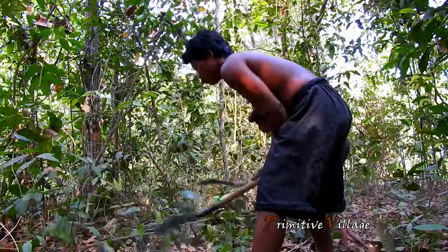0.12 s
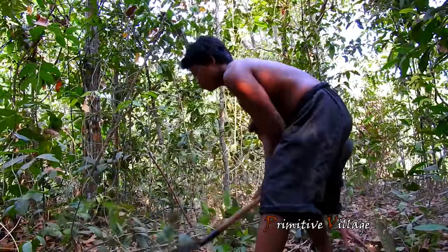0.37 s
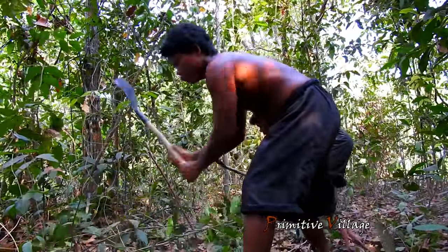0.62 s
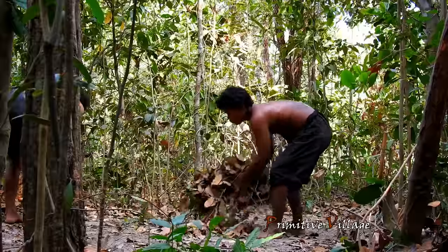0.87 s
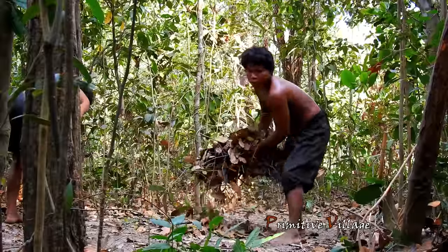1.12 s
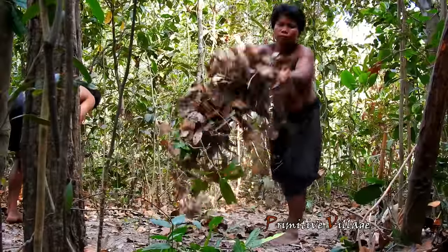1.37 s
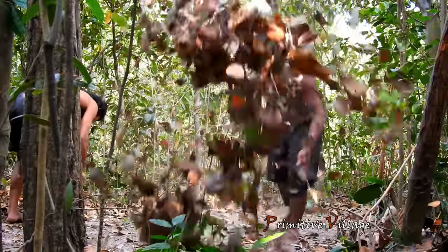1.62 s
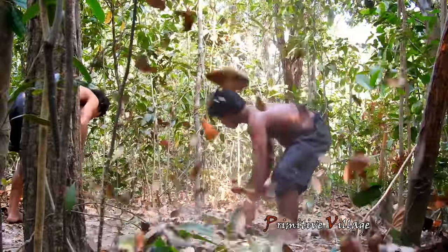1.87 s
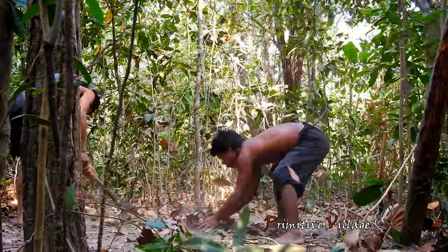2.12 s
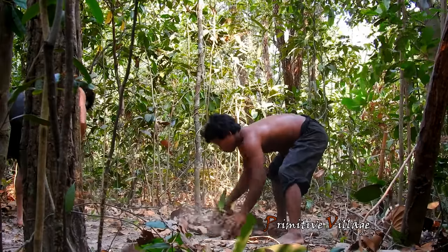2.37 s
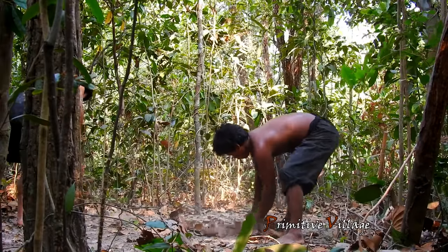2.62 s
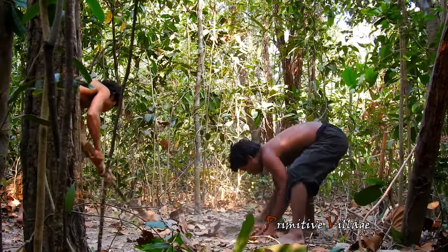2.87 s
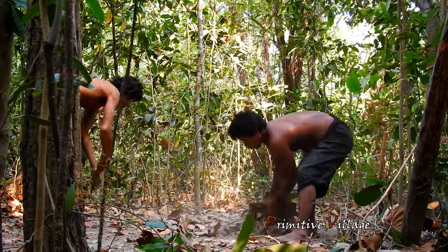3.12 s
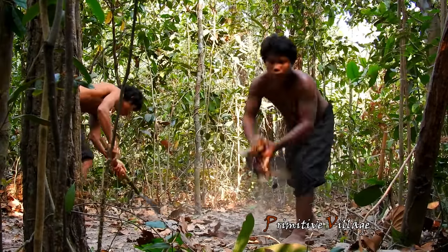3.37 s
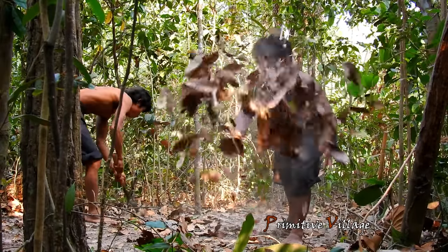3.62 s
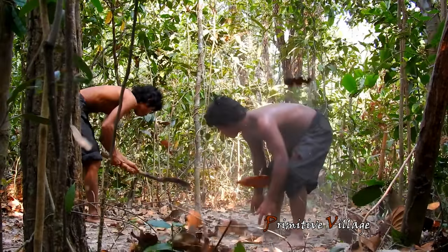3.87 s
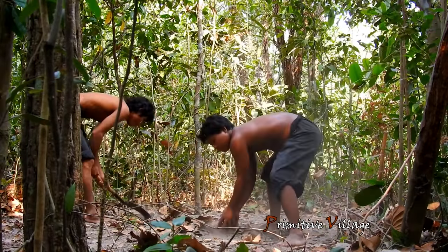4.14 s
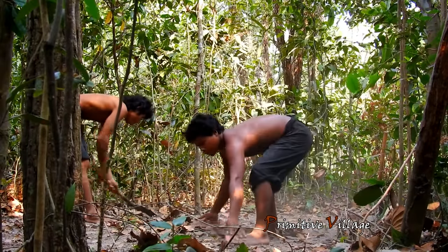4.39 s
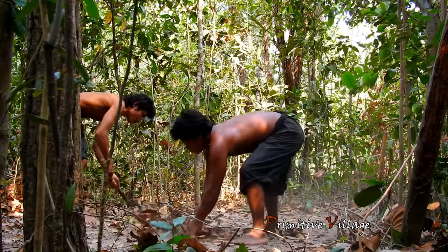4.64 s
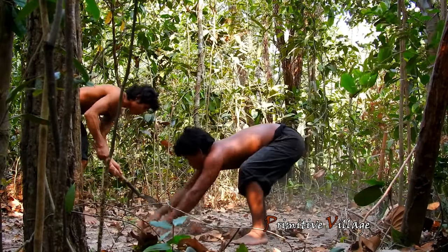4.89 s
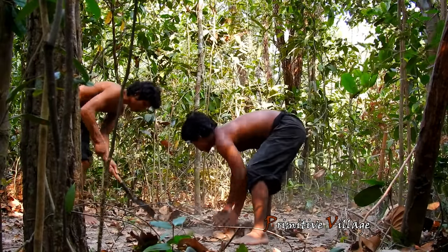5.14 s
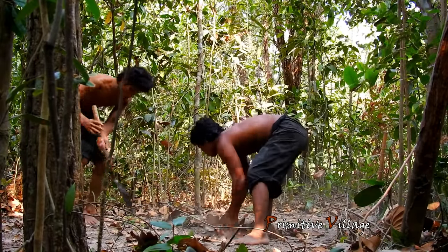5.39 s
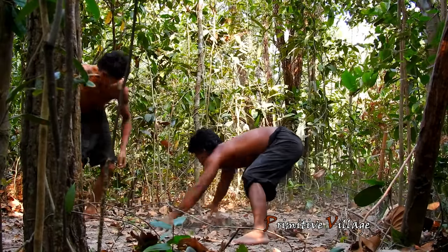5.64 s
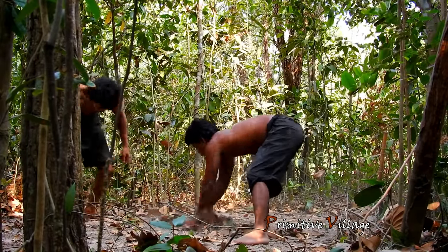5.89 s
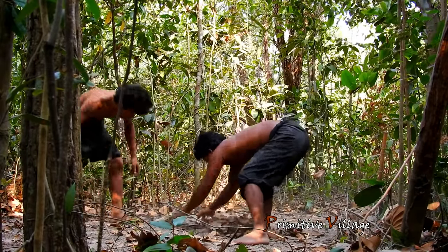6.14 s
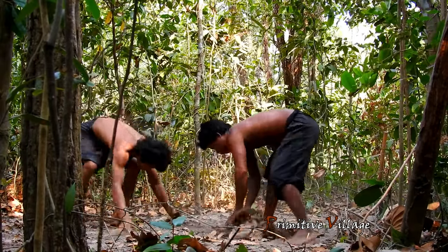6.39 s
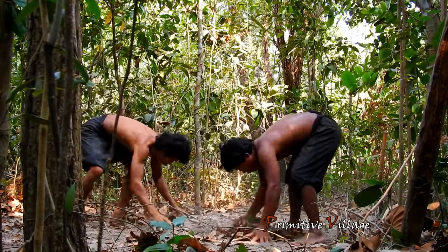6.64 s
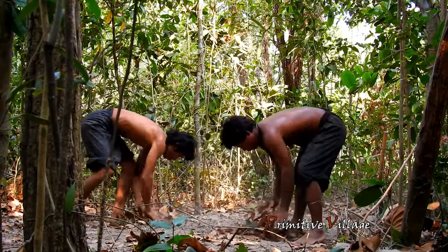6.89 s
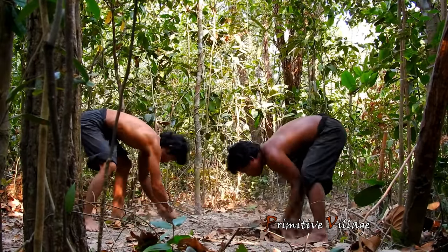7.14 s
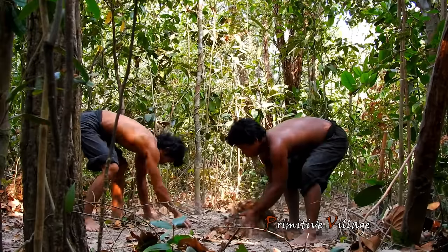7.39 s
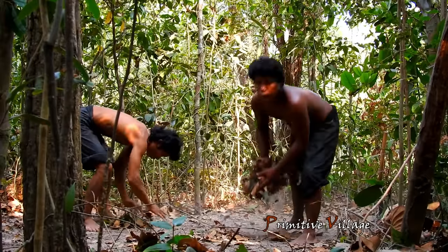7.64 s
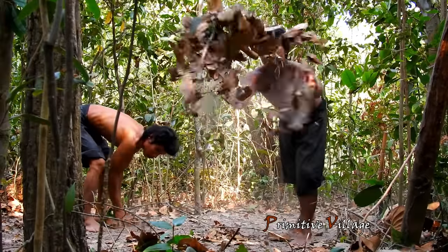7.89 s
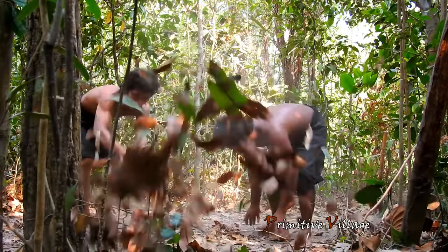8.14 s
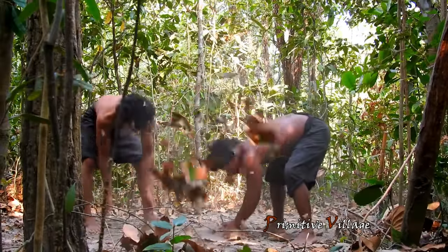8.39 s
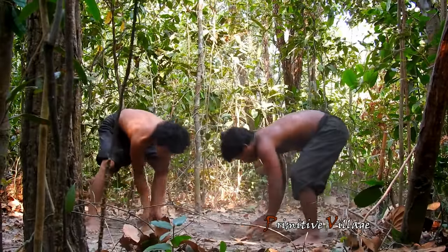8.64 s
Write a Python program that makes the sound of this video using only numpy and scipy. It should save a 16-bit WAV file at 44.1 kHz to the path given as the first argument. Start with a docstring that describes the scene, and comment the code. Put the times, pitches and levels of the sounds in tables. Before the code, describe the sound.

Hoe chops bite into dry leaf litter, then armfuls of crackling leaves are swept up and dropped under a steady high cicada hiss.

```python
"""A forest floor: dry leaf litter is hoed, swept up by hand and thrown, under a steady chorus of cicadas.
Leaves crackle as dense random clicks that ring at many pitches; twigs snap in short bursts of cracks.
Clods, feet and blade thud as damped low tones, and near blows set the hoe's own modes ringing.
Filtered noise rumbles as air and a low sine hums in spells, perhaps a far motor.
The loudest peaks clip, and early on the level dips briefly to near silence."""
import sys
import numpy as np
from scipy import signal
from scipy.fft import rfft, irfft
from scipy.io import wavfile

SR = 44100
rng = np.random.default_rng(int(sys.argv[2]) if len(sys.argv) > 2 else 0)


def ratio(d):
    """dB to gain"""
    e = np.asarray(d, float) / 20
    return 10 ** e


def inscribe(sig):
    """Save sig as 16-bit PCM at rate SR to the path in sys.argv[1].

    A 1-D sig is mono; a 2-D sig holds one channel per row.
    Samples are clipped to [-1, 1] before scaling.
    """
    pcm = np.round(np.clip(np.atleast_2d(sig).T, -1, 1) * 32767)
    wavfile.write(sys.argv[1], SR, pcm.astype(np.int16))


N = 386316
TIME = np.arange(N) / SR
HZ = np.maximum(np.arange(N // 2 + 1) * SR / N, 1)


def rms_one(x):
    """Scale to unit rms."""
    return x / np.sqrt(np.mean(x ** 2) + 1e-20)


def at_hz(points):
    """Read a table of frequency and value on the FFT grid, straight lines over log frequency."""
    hz, value = np.transpose(points)
    return np.interp(np.log(HZ), np.log(hz), value)


def colour(x, spectrum):
    """Minimum-phase filter (folded cepstrum): nothing sounds before its cause; the result has rms 1."""
    cepstrum = irfft(np.log(ratio(at_hz(spectrum))), N)
    cepstrum[1:N // 2] *= 2
    cepstrum[N // 2 + 1:] = 0
    response = np.exp(rfft(cepstrum))
    return rms_one(irfft(rfft(x) * response, N))


# How alike left and right are. Each row: frequency in Hz, likeness from 0 to 1.
LIKENESS = [(40, .5), (130, .86), (250, .8), (500, .68), (1000, .47), (2000, .34), (5000, .08),
            (12000, .03)]


def spread(pair):
    """Two unrelated signals become mid and side: alike in the bass, unlike in the treble."""
    alike = np.clip(at_hz(LIKENESS), 0, 1)
    mid, side = rfft(pair) * np.sqrt([1 + alike, 1 - alike])
    return irfft([mid + side, mid - side], N)


def drift(rate_hz):
    """Slow random wander of rms 1: noise through a double pole at rate_hz, run at SR / 40."""
    r = np.exp(-80 * np.pi * rate_hz / SR)
    noise = rng.standard_normal(N // 40 + 2002)
    slow = signal.lfilter([1], [1, -2 * r, r * r], noise)[2000:]
    return np.interp(np.arange(N) / 40, np.arange(len(slow)), rms_one(slow))


def grains(per_s, uneven_db, clump_db):
    """Clicks of uneven size that come in clumps, as two unrelated trains."""
    heights = ratio(uneven_db * np.minimum(rng.exponential(1, (2, N)), 4.5))
    sizes = heights * rng.choice([-1, 1], (2, N))
    chance = per_s * ratio(clump_db * drift(25)) / SR
    return sizes * (rng.random((2, N)) < chance)


def ring(x, hz, t60):
    """A unit click sets a damped sine of height about 1 ringing, 60 dB down after t60 seconds."""
    r = ratio(-60 / (t60 * SR))
    w = 2 * np.pi * hz / SR
    return signal.lfilter([0, np.sin(w)], [1, -2 * r * np.cos(w), r * r], x + 1e-18)


def swell(start_s, decay_s, rise):
    """Envelope of one contact: quick rise (as a share of the decay), then exponential fall; top below 1."""
    t = np.maximum(TIME - start_s, 0) / max(decay_s, .002)
    return (1 - np.exp(-t / rise)) * np.exp(-t)


def stroke(s, db, rise, hold, fall, flank=1.03):
    """Power of one movement: rises to its level at s, holds, falls; rise and fall are times for 20 dB."""
    # flank bends the slopes in dB: 1 is pointed, 2 a dome
    before = (s - TIME) / max(rise, .005)
    after = (TIME - s - max(hold, 0)) / max(fall, .005)
    away = np.maximum(np.maximum(before, after), 0)
    return ratio(db - 20 * np.minimum(away, 6) ** flank) ** 2


def leaves(clicks, cycles, ring_db, patchy_db):
    """Each click is a bare crack plus the ring of one leaf; which leaf sizes sound most keeps changing."""
    pitches = np.geomspace(600, 12000, num=44)
    dealt = rng.integers(0, len(pitches), clicks.shape)
    rings = 0
    for k, hz in enumerate(pitches):
        struck = clicks * (dealt == k) * ratio(patchy_db * drift(3.33))
        rings = rings + hz * ring(struck, hz, cycles / hz)
    return rms_one(clicks) + ratio(ring_db) * rms_one(rings)


# Tone of breaking leaves. Each row: frequency in Hz, relative level in dB.
RUSTLE = [(200, -44.5), (600, -31.5), (900, -18.5), (1300, -11), (1850, -15), (2350, -10.5), (2900, -11.5),
          (3350, -7), (3900, -6), (4500, -3), (6400, 4.5), (7400, 3.5), (8200, -5), (10000, -18),
          (13300, -28), (16000, -55.5)]
CRISP_HZ = 4140   # the crisp top of the crackle begins here


def halves(crackle):
    """Leaf colour, parted into rustle below and crisp top above; each rms 1."""
    spectrum = rfft(colour(crackle, RUSTLE))
    low = 1 / (1 + (HZ / CRISP_HZ) ** 6)
    rustle = irfft(spectrum * low, N)
    crisp = irfft(spectrum * (1 - low), N)
    return rms_one(rustle), rms_one(crisp)


# The near hoe chops into the litter.
# Each row: time of the top in seconds, level in dB, rise and fall in seconds per 20 dB.
CHOPS = [(0.041, -12.5, 0.024, 0.052), (.095, -14.5, 0.029, 0.076), (0.448, -11.5, 0.034, 0.038)]
# Thrown armfuls come down, clods first, then leaves.
# Each row: time of full level in seconds, level in dB, rise in seconds per 20 dB, hold in seconds,
# fall in seconds per 20 dB.
LANDINGS = [(1.758, -17, 0.035, .002, 0.096), (1.875, -20.5, .25, 0.012, .27),
            (3.855, -21, .06, 0.012, 0.18), (8.14, -26.5, 0.022, 0.016, .1),
            (8.2, -19.5, 0.035, 0.011, 0.18), (8.3, -26.5, 0.18, 0.045, 0.054),
            (8.604, -22.5, 0.089, .002, 0.091)]
# Hands, feet and hoe sweep through the litter.
# Each row: time of full level in seconds, level in dB, rise in seconds per 20 dB, hold in seconds,
# fall in seconds per 20 dB.
SWEEPS = [(0.153, -22.5, 0.06, .002, 0.13), (0.267, -33.5, 0.091, 0.32, 0.11),
          (0.492, -27, 0.074, .005, .15), (0.576, -34.5, .05, .01, 0.63), (0.847, -37.5, .02, 0.0045, 0.18),
          (1.005, -33, 0.032, .005, 0.15), (1.076, -43.5, 0.057, 0.31, .1),
          (1.425, -30.5, 0.12, 0.075, 0.13), (1.55, -36, .05, 0.13, .1), (2.187, -34.5, 0.23, 0.094, 0.42),
          (2.661, -34, 0.18, 0.011, .2), (2.926, -55, .04, 0.0082, .1), (3.117, -31.5, 0.26, 0.011, 0.15),
          (3.395, -43, 0.25, .01, 0.12), (3.515, -40.5, 0.088, 0.15, .2), (3.8, -31.5, 0.12, .03, .1),
          (4.01, -39, .1, .02, 0.34), (4.197, -39.5, .08, 0.04, 0.18), (4.619, -37.5, 0.3, 0.11, 0.39),
          (5.036, -37, 0.096, 0.075, 0.28), (5.2, -43.5, 0.12, 0.12, .045),
          (5.514, -36.5, 0.16, 0.011, 0.17), (5.88, -39, 0.12, 0.032, 0.14), (5.985, -34, 0.3, 0.036, 0.23),
          (6.33, -37, .035, 0.026, 0.38), (6.578, -37.5, 0.11, .01, .14), (6.81, -33.5, 0.042, 0.086, 0.23),
          (7.284, -37, 0.095, 0.079, 0.23), (7.472, -33.5, .2, .01, 0.29), (7.83, -38, 0.082, 0.25, .1),
          (8.396, -36.5, .05, 0.13, 0.086), (8.686, -38.5, .05, .01, 0.24)]
# Tone of soil and stems under the rustle. Each row: frequency in Hz, relative level in dB.
WEIGHT = [(40, -46), (130, 3), (250, 1.5), (450, -1.5), (700, -3.5), (1100, -24), (3000, -74)]
# soil and stems, relative to the rustle of the same movement
CHOP_WEIGHT_DB, LANDING_WEIGHT_DB, SWEEP_WEIGHT_DB = -7, -11.5, -13.5
# crisp scraps fly up after each chop: level relative to the chop, delay, times for 20 dB, flank power
SPRAY_DB, SPRAY_LAG_S, SPRAY_RISE_S, SPRAY_FALL_S, SPRAY_ROUND = -2, 0.033, 0.055, 0.17, 0.75
CRISP_DB, CRISP_FOLLOWS = -23.5, .7   # crisp top at a rustle of -34 dB, its share of the swing


def litter():
    """One crackle of breaking leaves feeds rustle and crisp top; heavier, sparser grains give the weight."""
    chops = sum(stroke(s, db, rise, 0, fall) for s, db, rise, fall in CHOPS)
    landings = sum(stroke(*row) for row in LANDINGS)
    sweeps = sum(stroke(*row) for row in SWEEPS)
    moved = np.sqrt(chops + landings + sweeps)
    heavy = np.sqrt(ratio(2 * CHOP_WEIGHT_DB) * chops
                    + ratio(2 * LANDING_WEIGHT_DB) * landings
                    + ratio(2 * SWEEP_WEIGHT_DB) * sweeps)
    spray = np.sqrt(sum(stroke(s + SPRAY_LAG_S, db + SPRAY_DB, SPRAY_RISE_S, 0, SPRAY_FALL_S, SPRAY_ROUND)
                        for s, db, *_ in CHOPS))
    top = ratio(CRISP_DB) * (moved / ratio(-34)) ** CRISP_FOLLOWS
    clicks = grains(9000, uneven_db=2.0, clump_db=2.5)
    crackle = leaves(clicks, cycles=127.0, ring_db=-2.5, patchy_db=3.0)
    rustle, crisp = halves(spread(crackle))
    clods = colour(spread(grains(900, uneven_db=2.0, clump_db=2.5)), WEIGHT)
    return moved * rustle + (top + spray) * crisp + heavy * clods


# Snaps of twigs and blade in the leaves.
# Each row: start in seconds, relative level in dB, decay time constant in seconds.
SNAPS = [(0.02, -10.5, 0.012), (0.046, -5, 0.012), (0.43, -13, 0.0083), (0.458, -10, 0.012),
         (1.006, 5, 0.0079), (1.375, 1, 0.015), (1.472, -4.5, 0.014), (1.494, -3.5, 0.0081),
         (1.743, -10, 0.013), (1.85, -4, 0.011), (2.296, -1, 0.01), (3.135, -20, 0.0077),
         (3.741, -6, 0.009), (3.91, -2, 0.018), (4.181, -3.5, 0.0095), (2.595, -16, 0.0072),
         (2.916, -13.5, 0.007), (4.473, -14, 0.0064), (5.107, -10, 0.014), (5.275, -10, 0.016),
         (7.376, -15, 0.008), (8.006, -13, 0.017), (7.29, -2.5, 0.012), (7.483, -4.5, 0.013),
         (8.136, -14, 0.0078), (8.19, -3, 0.0098), (8.52, -5.5, 0.011), (8.593, -1, 0.017)]


def snaps():
    """Each snap is a dense burst of cracks with the colour of the leaves, quick to rise and decay."""
    cracks = colour(spread(grains(9000, uneven_db=3.0, clump_db=1.0)), RUSTLE)
    shape = sum(ratio(db) * swell(s, decay, rise=0.45) for s, db, decay in SNAPS)
    return ratio(-6.5) * shape * cracks


# Thuds of blade, feet and clods on the soil; contact begins 3 ms before the listed time.
# Each row: time in seconds, peak level in dB, main pitch in Hz, decay time constant of the contact in seconds.
THUDS = [(0.033, -14, 250, 0.011), (0.096, -15, 161, 0.0086), (0.438, -19, 181, 0.018),
         (1, -23, 205, 0.0068), (1.376, -26, 170, 0.0082), (1.754, -17.5, 219, 0.019),
         (3.873, -22, 258, 0.013), (4.18, -24.5, 209, 0.0062), (4.511, -33, 276, 0.0055),
         (5.289, -37, 151, 0.012), (5.925, -20, 185, 0.02), (7.47, -29.5, 152, 0.016),
         (0.45, -19, 110, 0.014), (8.143, -21, 300, 0.0065), (8.236, -33, 222, 0.017),
         (8.601, -31, 202, 0.0085)]


def thuds():
    """A short crumbling contact drives the hollow of the soil and a broader, higher push."""
    crumble = spread(grains(900, uneven_db=2.0, clump_db=2.5))
    band = signal.butter(2, [110, 400], "band", fs=SR, output="sos")
    crumble = signal.sosfilt(band, crumble)
    out = 0
    for s, db, hz, decay in THUDS:
        contact = swell(s - .003, decay, rise=0.24) * crumble
        hollow = ring(contact, hz, 0.03)
        push = ring(contact, 1.55 * hz, 0.018)
        thud = hollow + ratio(-7.5) * push
        out = out + ratio(db) * thud / np.max(np.abs(thud))
    return out


# Modes of hoe blade and handle. Each row: pitch in Hz, relative level in dB, time to fall 60 dB in seconds.
HOE = [(410, 6.5, 0.07), (652, 14, 0.056), (940, 8.5, 0.056), (1350, 7.5, 0.062), (2240, -17, .05)]
# Blows of the near hoe that set it ringing. Each row: start in seconds, relative level in dB.
BLOWS = [(0.037, -20), (0.09, -12), (0.44, -13.5)]


def hoe():
    """The blade bites through stems: a few ms of chatter excite its modes."""
    chatter = rms_one(rng.standard_normal(N))
    bite = chatter * sum(ratio(db - 30.5) * swell(s, 0.0049, rise=0.23) for s, db in BLOWS)
    return sum(ratio(db) * ring(bite, hz, t60) for hz, db, t60 in HOE)


# The chorus swells and sinks. Each row: time in seconds, level in dB.
CHORUS = [(0.0, -17), (0.63, -17), (0.8, -20), (1.27, -25), (1.93, -23), (2.41, -23.5), (4.0, -23.5),
          (4.29, -26), (4.64, -23), (7.22, -25.5), (7.37, -25), (8.76, -23.5)]
# Tone of the chorus. Each row: frequency in Hz, relative level in dB.
CICADAS = [(1500, -60), (3600, -31), (4500, -21), (4750, -11), (5100, -8), (5600, -12), (6350, -2),
           (6700, -6), (7150, 1.5), (7550, -5), (8000, -8), (9200, -27), (10300, -32), (11000, -27),
           (12000, -36), (13400, -51), (14900, -41), (16000, -48)]


def cicadas():
    """Many far tymbals blur into a dense fizz around 7 kHz that wavers a little."""
    fizz = colour(spread(grains(9000, uneven_db=0.5, clump_db=0.8)), CICADAS)
    level_db = np.interp(TIME, *np.transpose(CHORUS))
    return ratio(level_db + 0.73 * drift(12.0)) * fizz


# A low hum, perhaps a far motor, comes in spells.
# Each row: start in seconds, length in seconds, pitch in Hz, level in dB.
HUM_SPELLS = [(0, 4.4, 98, -52.5), (4.755, 1.4, 97.3, -44.5), (6.79, 0.29, 98, -43.5),
              (7.283, 0.23, 99.3, -43.5), (7.792, 0.48, 99.2, -43.5)]
HUM_EDGE_S = .05


def hum():
    """A sine of unsteady pitch and level fades in and out around the ends of each spell."""
    waver = 2 * np.pi * np.cumsum(0.93 * drift(7.2)) / SR
    flutter = ratio(0.72 * drift(6))
    out = 0
    for s, length, hz, db in HUM_SPELLS:
        inside = np.minimum(TIME - s, s + length - TIME)
        fade = np.clip(inside / HUM_EDGE_S + .5, 0, 1) ** 2
        out = out + ratio(db) * fade * np.sin(2 * np.pi * hz * TIME + waver)
    return np.sqrt(2) * flutter * out


# Tone of the air. Each row: frequency in Hz, relative level in dB.
AIR = [(22, -35), (40, -1), (70, 5.5), (108, 1.5), (200, -9), (390, -27), (800, -26.5), (1340, -23.5),
       (1800, -29.5), (2300, -19), (3400, -18.5), (5000, -10.5), (12000, -47)]
AIR_DB = -43


def air():
    """Low rumble of the air: coloured noise whose level wanders slightly."""
    noise = colour(spread(rng.standard_normal((2, N))), AIR)
    return noise * ratio(AIR_DB + 0.24 * drift(3.6))


DIP_S, RETURN_S = .8131, .8465   # the drop, and the moment of full level again
DIP_DROP_DB, DIP_SINK_DB_PER_S, DIP_RISE_DB_PER_S = -19, -2400, 5500


def dip():
    """Gain of a brief dip: the level drops at once, sinks on to -62 dB, and comes back fast."""
    going = ratio(np.maximum(DIP_DROP_DB + DIP_SINK_DB_PER_S * (TIME - DIP_S), -62))
    coming = ratio(np.minimum(DIP_RISE_DB_PER_S * (TIME - RETURN_S), 0))
    return np.where(TIME < DIP_S, 1, np.maximum(going, coming))


BALANCE_DB = .5   # left over right


def scene():
    """All sources, slightly to the left, with the brief dip in level."""
    mix = litter() + snaps() + thuds() + hoe() + cicadas() + air() + hum()
    balance = ratio(BALANCE_DB * np.array([[.5], [-.5]]))
    return mix * balance * dip()


def low_pass(x):
    """Removes everything above the highest recorded frequency."""
    return signal.sosfilt(signal.butter(12, 15830, fs=SR, output="sos"), x)


def record(dry):
    """The loudest peaks are clipped at full scale."""
    mix = np.clip(dry, -1, 1)
    return low_pass(mix)


dry = scene()
out = record(dry)
inscribe(out)
```